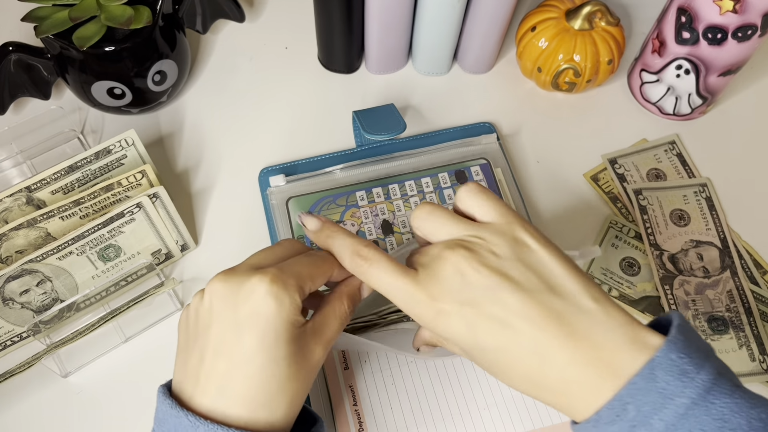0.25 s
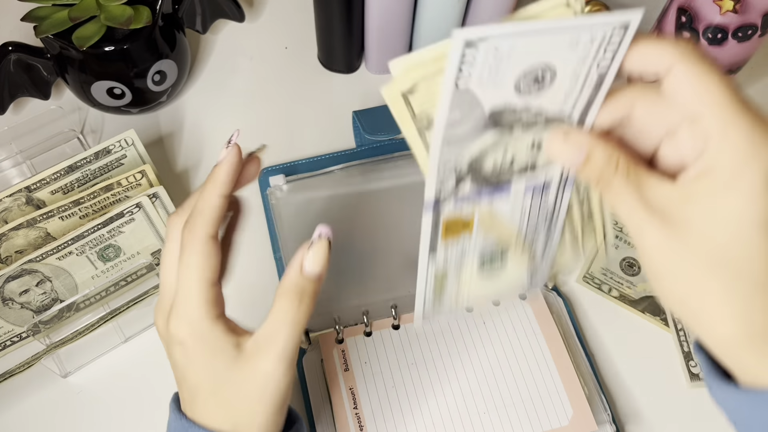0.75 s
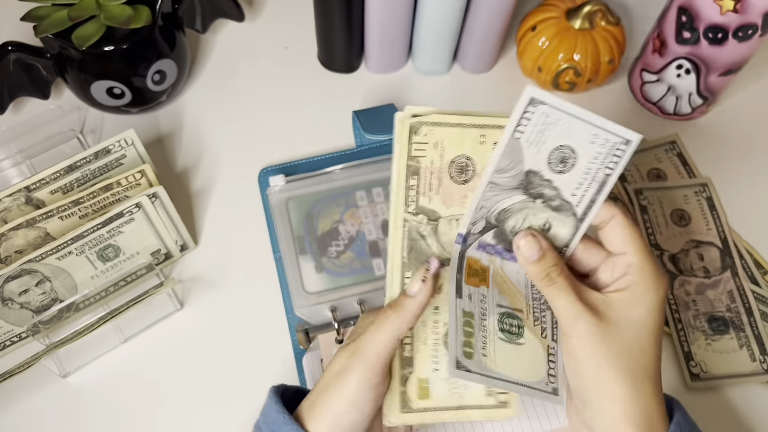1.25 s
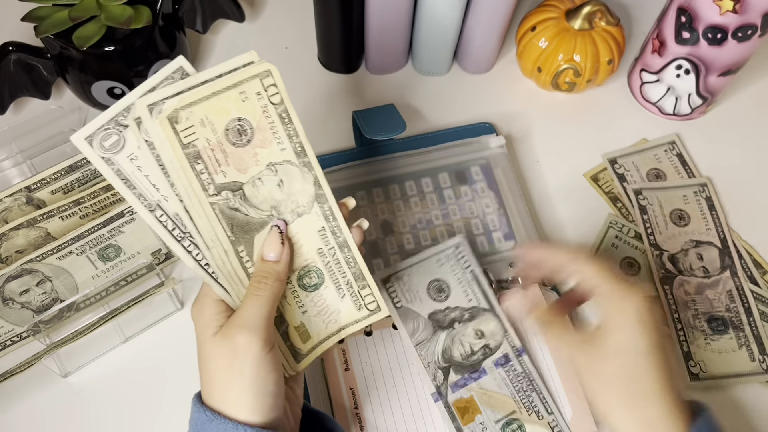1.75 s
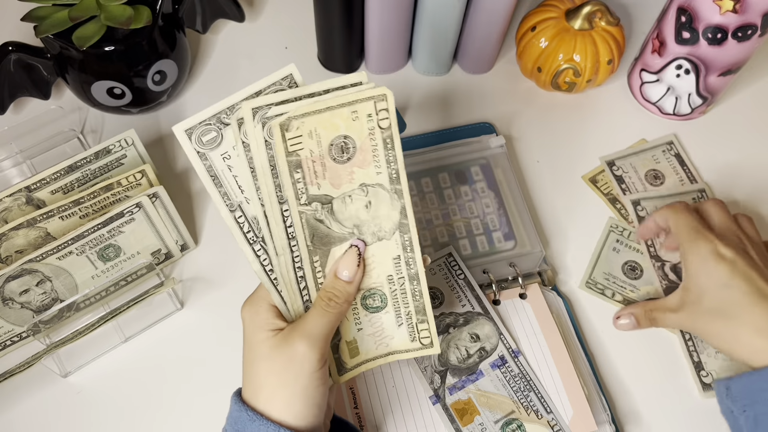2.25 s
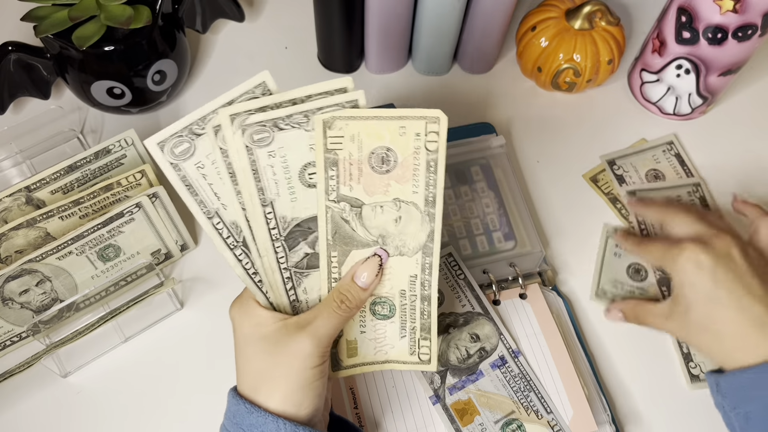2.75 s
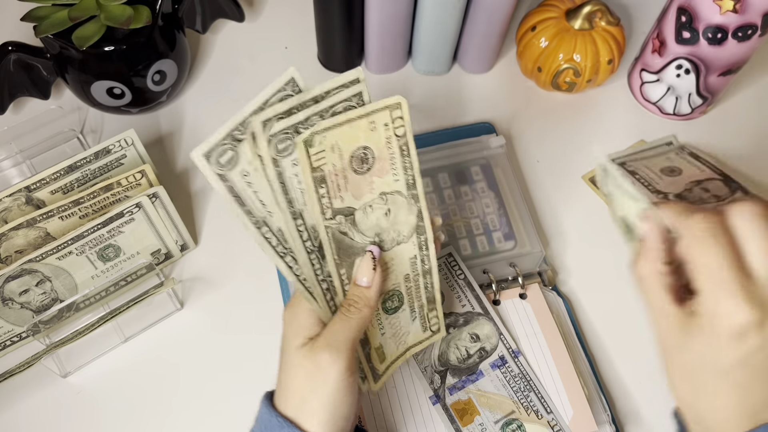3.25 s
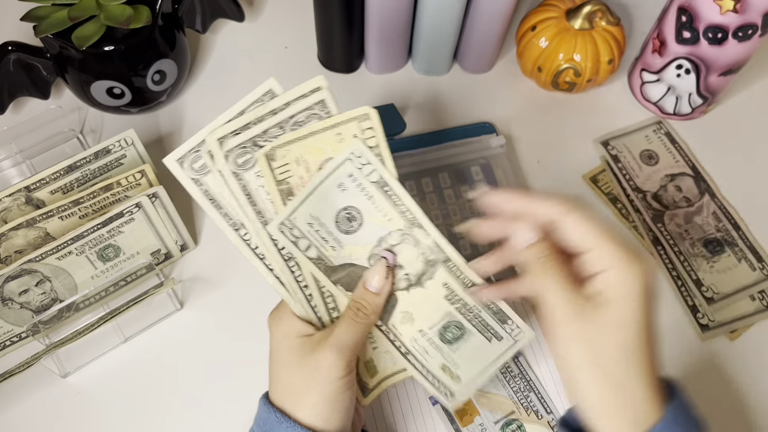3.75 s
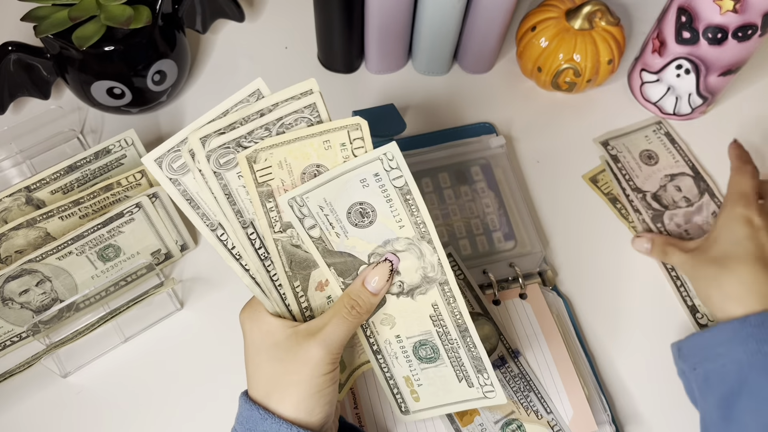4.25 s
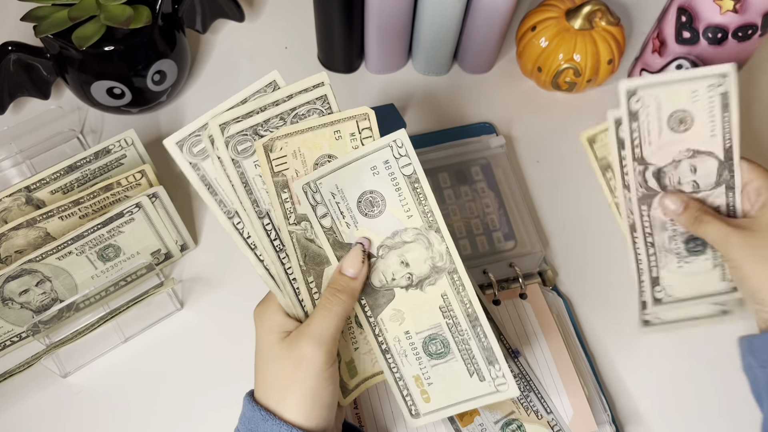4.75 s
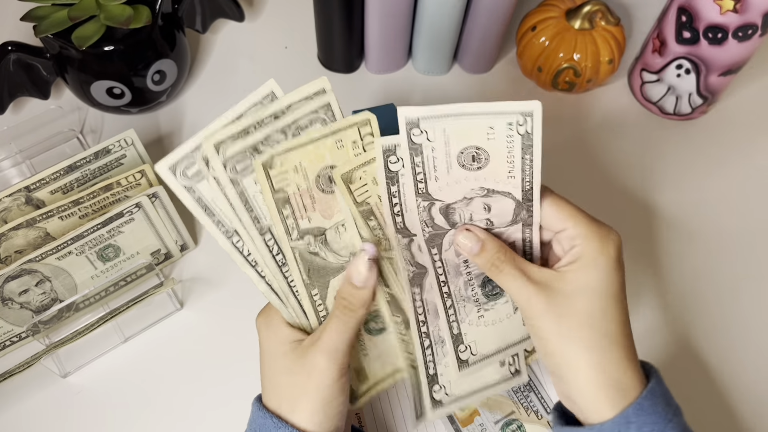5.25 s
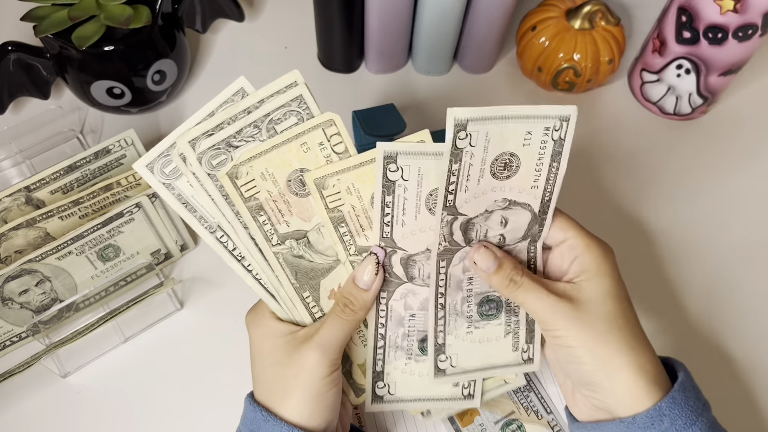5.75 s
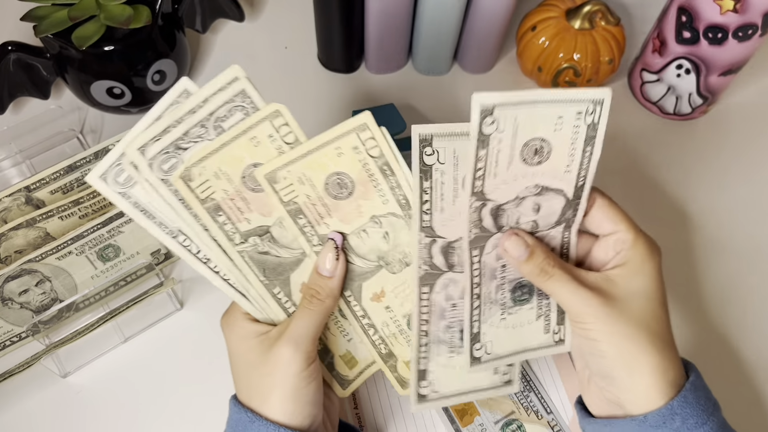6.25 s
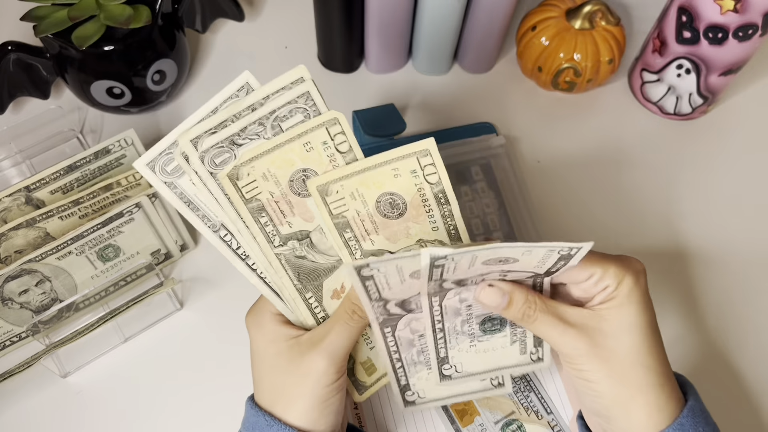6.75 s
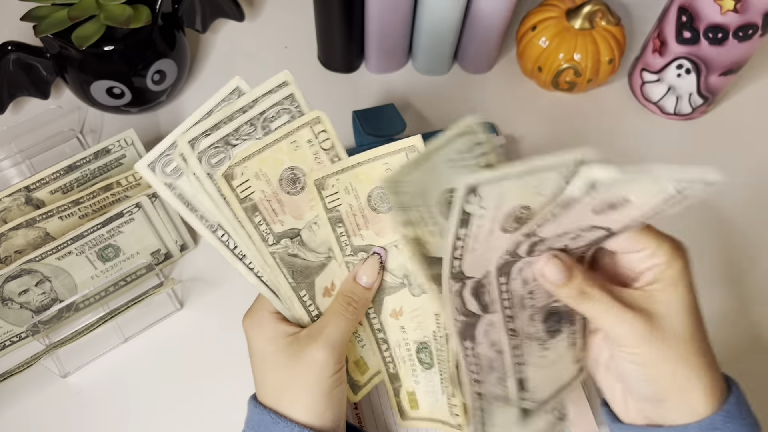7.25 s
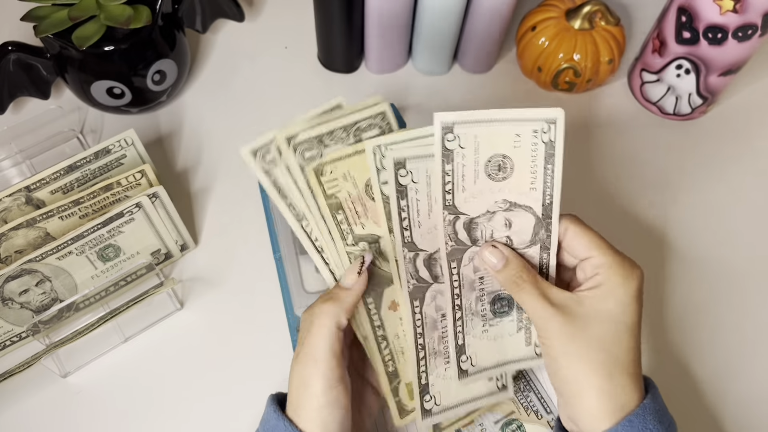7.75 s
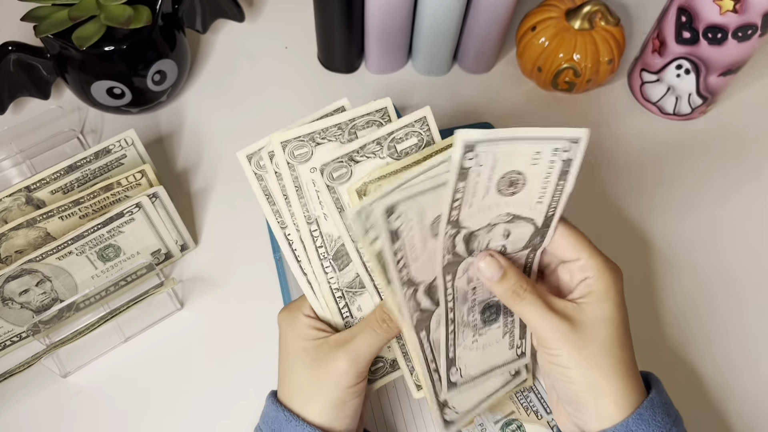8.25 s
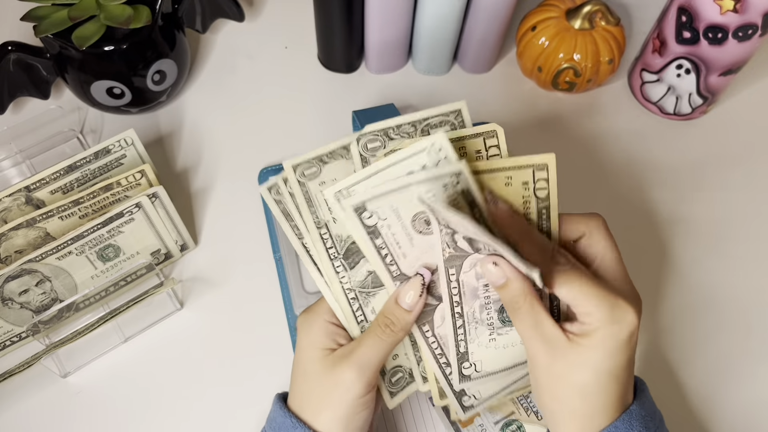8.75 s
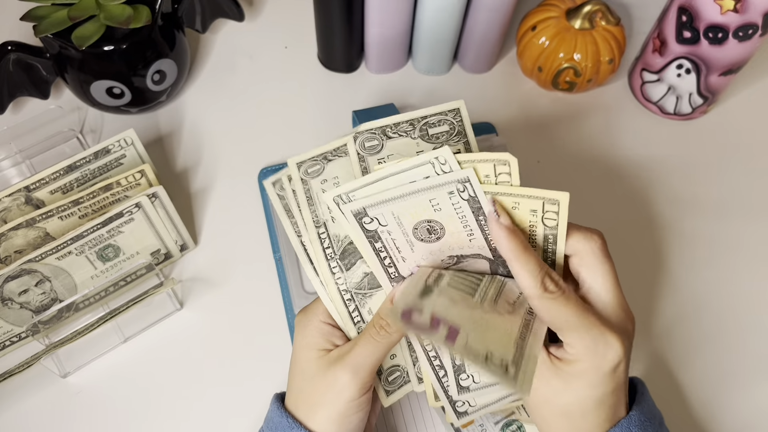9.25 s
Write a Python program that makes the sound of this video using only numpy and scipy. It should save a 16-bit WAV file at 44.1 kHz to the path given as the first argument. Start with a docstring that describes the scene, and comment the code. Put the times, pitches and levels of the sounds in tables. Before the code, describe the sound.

Dry paper handling heard by a nearby phone microphone: notes hiss over one another, edges flick free and creases pop. It starts busy, with pouch ticks and dull hand and binder knocks on the desk, quiets after two seconds, revives with crisp flicks and a double thump, then settles into softer shuffling and a last burst of snaps. The room is small, with little echo and a low background rumble.

```python
"""A small quiet room, close under a phone: banknotes leave a plastic pouch, are sorted and fanned by hand over a desk.
Sliding sheets hiss as noise in stick-slip grains; flicked edges, snapping creases and wrinkles ring patches of paper.
Fingertips pat the stack as short band noise; hands and a binder knock and drag on the desk's decaying modes.
A faint rumble, a thin hiss and a whine, all shaped noise, lie under it."""
import sys
import numpy as np
from scipy import signal
from scipy.fft import rfft, irfft, next_fast_len
from scipy.io import wavfile
from scipy.ndimage import uniform_filter1d, map_coordinates

SR = 44100
rng = np.random.default_rng(int(sys.argv[2]) if len(sys.argv) > 2 else 0)


def master(y):
    """Save y as 16-bit WAV."""
    cut = np.clip(np.atleast_2d(y).T, -1, 1)
    pcm = np.round(cut * 32767)  # scale
    wavfile.write(sys.argv[1], SR, pcm.astype(np.int16))


N = 419391
TIME = np.arange(N) / SR


def undb(db):
    """Decibels to gain."""
    return 10 ** (np.asarray(db) / 20)


def unit(x):
    """Scale to rms 1."""
    return x / np.sqrt(np.mean(x ** 2) + 1e-30)


def colour(points, hz):
    """Read a spectrum in dB on a log-frequency axis."""
    point_hz, db = np.transpose(points)
    return np.interp(np.log(np.maximum(hz, 1)), np.log(point_hz), db)


def bins_hz(size):
    """Frequencies of the rfft bins."""
    return np.arange(size // 2 + 1) * SR / size


def add(out, start_s, x):
    """Mix a sound in at its start time."""
    i = int(start_s * SR)
    out[:, i:i + x.shape[-1]] += x[..., :max(N - i, 0)]


def pair(size, spread):
    """Noise at two ports: a common part and a share that each hears alone."""
    common = rng.standard_normal(size)
    return unit(common + spread * rng.standard_normal((2, size)))


def walk(rate_hz, size):
    """Random values at a given rate, joined by straight lines, with a spread near 1."""
    steps = np.arange(size) * rate_hz / SR
    count = int(steps[-1]) + 2
    return 1.2 * np.interp(steps, np.arange(count), rng.standard_normal(count))


def rubbing(motion, times_s):
    """Level, body and sheen of the sliding sheets at the given times."""
    motion_s, *columns = motion
    return [np.interp(times_s, motion_s, c) for c in columns]


# A narrow whine: centre in Hz, width in Hz, left level in dB.
WHINE = (1715, 59, -71.5)


def whine():
    """A narrow, wavering band of noise, mostly on the left."""
    hz, width_hz, db = WHINE
    edges_hz = (hz - width_hz / 2, hz + width_hz / 2)
    band = signal.butter(2, edges_hz, "bandpass", fs=SR, output="sos")
    return unit(signal.sosfilt(band, pair(N, spread=2.5))) * undb([[db], [db - 7.5]])


def steady(points, spread):
    """Background noise of a given colour, rms 1."""
    size = next_fast_len(N, True)
    spectrum = rfft(pair(size, spread), size) * undb(colour(points, bins_hz(size)))
    return unit(irfft(spectrum, size)[:, :N])


# Hiss spectrum. Each row: frequency in Hz, relative density in dB per Hz.
HISS_COLOUR = [(100, -33), (500, -17), (900, -14), (1350, -3), (1550, -2), (1750, 0.5), (2100, -6.5),
               (2550, -12.5), (2800, -20), (5200, -30), (6800, -30.5), (9000, -55.5), (15000, -37)]


def hiss(left_db=-62.5, right_db=-72):
    """A thin band of noise, slightly unsteady and mostly on the left."""
    noise = steady(HISS_COLOUR, spread=11.0) * undb(1.0 * walk(21, N))
    return noise * undb([[left_db], [right_db]])


# Rumble between the strokes. Each row: time in seconds, level in dB.
RUMBLE_LEVEL = [(0, -57.5), (1.95, -63), (3.1, -62), (3.6, -57.5), (4.15, -63.5), (4.6, -55.5),
                (5.7, -64.5), (6.05, -63), (7.3, -62), (8.6, -59), (9.5, -60)]


def stirring(motion, arm_db=-6, sway_s=0.11, shake_db=-17, shake_decay_s=0.061):
    """Rumble strength: it swells as the arms move the sheets, and each knock shakes the desk for a moment."""
    db, body_db, _ = rubbing(motion, TIME)
    rest = undb(np.interp(TIME, *np.transpose(RUMBLE_LEVEL)))
    arms_power = uniform_filter1d(undb(db + body_db / 2 + arm_db) ** 2, int(sway_s * SR))
    blows = np.zeros(N)
    for start_s, knock_db, *_ in KNOCKS:
        blows[int(start_s * SR)] = undb(knock_db + shake_db)
    shake = signal.lfilter([1], [1, -np.exp(-1 / (shake_decay_s * SR))], blows)
    return np.sqrt(rest ** 2 + arms_power + shake ** 2)


# Rumble spectrum. Each row: frequency in Hz, relative density in dB per Hz.
RUMBLE_COLOUR = [(20, -32), (32, -15), (45, -0.5), (65, 3), (95, -1.5), (125, -1.5), (170, -20.5),
                 (260, -21.5), (500, -35), (1200, -96)]


def rumble(motion, uneven_db=3.0, uneven_rate_hz=11):
    """Low noise in both ports, uneven and stirred by the handling."""
    noise = steady(RUMBLE_COLOUR, spread=0.22)
    return noise * stirring(motion) * undb(uneven_db * walk(uneven_rate_hz, N))


def ring(modes, centre_hz, focus_db, skew_rad, t, roughness=0.35, rise_cycles=0.36, travel=0.031, deepest_db=19):
    """Desk modes around a centre; bending waves bring the lows later and build over about a cycle."""
    out = 0
    for hz, db, t60_s in modes:
        detune, turn, left, right = rng.standard_normal(4)
        delay_s = travel / np.sqrt(hz) * (hz < 350)
        age_s = np.maximum(t - delay_s, 0)
        swell = 1 - np.exp(-(age_s * hz / rise_cycles) ** 2)
        decay = np.exp(-np.log(1000) * age_s / t60_s)
        # each port meets the mode's pattern at its own phase
        port_rad = skew_rad * np.array([[left], [right]])
        wave = np.sin(2 * np.pi * (hz * (1 + 0.016 * detune) * age_s + turn) + port_rad)
        # loose things lying on the desk roughen each mode
        wave = wave * (1 + roughness * walk(hz / 2, len(t)))
        off_centre_db = min(focus_db * np.log2(hz / centre_hz) ** 2, deepest_db)
        out = out + undb(db - off_centre_db) * swell * decay * wave
    return out / np.sqrt(np.mean(out[:, :int(.04 * SR)] ** 2))


# Upper desk-top modes. Each row: nominal frequency in Hz, relative level in dB, t60 in seconds.
DESK_HIGH = [(448, -5.5, 0.16), (468.4, 9, 0.061), (529, 0, 0.2), (587, -3.5, 0.061), (665, -9, 0.1),
             (760, -8, 0.094), (979.6, -6.5, 0.15), (1060, -6.5, 0.06), (1124.3, -5, 0.14),
             (1251.3, -8.5, 0.062), (1498, -27, 0.53), (1574, -6.5, 0.079), (1880, -12, 0.098)]


def scraping(motion, light_db=5, range_db=8, judder_db=3, judder_rate_hz=120, spread=0.96):
    """A hand pressed hard enough to give the rubbing body drags on the desk and keeps its modes singing."""
    db, body_db, _ = rubbing(motion, TIME)
    pressure = np.clip((body_db - light_db) / range_db, 0, 1)
    judder = judder_db * walk(judder_rate_hz, N)
    drag = pair(N, spread) * undb(db + body_db + judder) * pressure
    out = 0
    for hz, mode_db, t60_s in DESK_HIGH:
        pole = np.exp((2j * np.pi * hz - np.log(1000) / t60_s) / SR)
        gain = undb(mode_db - 7.0) * np.sqrt(1 - abs(pole) ** 2)
        out = out + gain * signal.lfilter([1], [1, -pole], drag).imag
    return out


# Lower desk-top modes. Each row: nominal frequency in Hz, relative level in dB, t60 in seconds.
DESK_LOW = [(68, -1, 0.13), (95.6, -15.5, 0.094), (117.52, 6, 0.35), (163.6, -8, 0.38), (192.7, 0.5, 0.24),
            (231, -4.5, 0.09), (285.5, 3, 0.18)]
# Hands and binder on the desk. Each row: start in seconds, level in dB, strongest ring in Hz,
# hardness (upper modes) in dB, gain under the resting hand in dB.
KNOCKS = [(0.01, -54.5, 184, -30, -3), (0.211, -44.5, 179, -8, -4), (0.513, -35.5, 157, -33, -8),
          (0.655, -47.5, 158, -14, 5.5), (0.903, -45.5, 123, -12, -3), (0.971, -46.5, 124, -18, -6),
          (1.006, -43, 189, -16, -17), (1.03, -46, 190, -19, -14), (1.263, -41, 114, -19, -9),
          (1.717, -32.5, 117, -28, -9), (1.836, -48, 120, -20, -21), (2.084, -49, 160, -15, -2),
          (2.142, -38.5, 187, -7.5, -12), (2.198, -37.5, 189, -7.5, 1), (2.252, -44, 200, -0.5, -8),
          (2.287, -36.5, 193, -9, -19.5), (2.537, -50.5, 182.2, -15, 6.5), (2.613, -50, 174, -17, -18),
          (2.735, -57, 178, -8, 4), (2.812, -52, 177.5, -11.5, -8), (2.844, -61, 205, 4.5, 5),
          (3.122, -55, 97, -21, -1), (3.202, -61, 285, 1, -11), (3.431, -55.5, 142, 1.5, 2),
          (3.508, -55, 130, 0, 2), (3.743, -54.5, 161, 0, -6), (4.255, -29, 210.6, -7, -5.5),
          (4.373, -30, 216, -2.5, -14), (5.308, -66, 258, 2, -5.5), (5.552, -57.5, 240, 7.5, -7),
          (5.591, -57, 130, -14, -3), (5.681, -60, 125, -12, 0), (5.724, -57, 95, -25, -7),
          (6.638, -51, 136, -23, -6), (7.315, -60, 263, -0.5, -14), (7.606, -52, 282, -18, -10),
          (7.65, -52, 277, -10, -9.5), (7.669, -53, 70, -48, -5), (8.184, -57.5, 107.3, -10, -1)]


def knocks(high_db=-1, slap_db=-5, slap_decay_s=0.013, settle_s=0.0173, settling_s=0.034, rattle=0.26, size=16384):
    """Each place on the desk favours its own low modes; harder contact slaps and wakes the upper ones."""
    out, t = np.zeros((2, N)), np.arange(size) / SR
    # the hand comes to rest and changes the level
    resting = np.clip((t - settle_s) / settling_s, 0, 1)
    slap_band = signal.butter(2, (330, 680), "bandpass", fs=SR, output="sos")
    for start_s, db, hz, hard_db, muted_db in KNOCKS:
        low = ring(DESK_LOW, hz, focus_db=35.5, skew_rad=0.38, t=t, roughness=rattle * undb(hard_db / 2))
        high = ring(DESK_HIGH, 750, focus_db=-1.0, skew_rad=1.0, t=t)
        slap = unit(signal.sosfilt(slap_band, pair(size, spread=0.54)))
        slap = slap * np.sqrt(0.013 / slap_decay_s) * np.exp(-t / slap_decay_s)
        upper = undb(high_db) * high + undb(slap_db) * slap
        add(out, start_s, undb(db + muted_db * resting) * (low + undb(hard_db) * upper))
    return out


# Fingertips on the stack. Each row: start in seconds, relative level in dB, centre of the bump in Hz.
PATS = [(1.197, -46, 600), (1.355, -48, 666), (1.496, -48, 834), (4.601, -54, 897), (5.057, -52, 834),
        (5.07, -53, 885), (5.131, -62, 840), (5.509, -48, 447), (6.48, -55, 690), (7.09, -48.5, 291),
        (7.274, -46, 1166), (7.552, -55, 460), (7.583, -54, 595), (7.653, -52, 860), (7.701, -47.5, 575),
        (7.891, -52.5, 570), (7.945, -55, 475), (8.044, -54, 583)]


def pats(level_db=-1, octaves=1.8, decay_s=0.004, rise_s=0.001, spread=0.41, size=4096):
    """A soft fingertip gives the layered notes a short, dull bump."""
    out, t = np.zeros((2, N)), np.arange(size) / SR
    for start_s, db, hz in PATS:
        edges_hz = hz * 2 ** (octaves * np.array([-.5, .5]))
        band = signal.butter(1, edges_hz, "bandpass", fs=SR, output="sos")
        push = pair(size, spread) * (1 - np.exp(-t / rise_s)) * np.exp(-t / decay_s)
        bump = unit(signal.sosfilt(band, push)) * np.sqrt(2 * decay_s * SR / size)
        add(out, start_s, undb(db + level_db) * bump)
    return out


# Colour of rubbed paper. Each row: frequency in Hz, relative density in dB per Hz.
PAPER = [(60, 1), (150, 2), (290, 9.5), (380, 3.5), (560, 4.5), (850, -0.5), (1250, 2), (2500, 0),
         (3600, 0.5), (5500, -3.5), (8300, -0.5), (11500, -4), (14500, -9.5), (15700, -3)]
# Full body, neutral middle and full sheen: three frequencies in Hz.
ZONES_HZ = (600, 2500, 9000)


def paper_db(hz, body_db, sheen_db):
    """Paper colour: a bending sheet adds body, a light dry touch adds sheen."""
    zone = np.interp(np.log(np.maximum(hz, 1)), np.log(ZONES_HZ), [-1, 0, 1])
    return colour(PAPER, hz) + np.maximum(-zone, 0) * body_db + np.maximum(zone, 0) * sheen_db


def radiate(push, body_db, sheen_db, length_s, ring_hz, ring_db, ring_octaves=0.13):
    """A short push rings a patch of the sheet; 1.2-5 kHz has rms 1 over the given length."""
    size = push.shape[-1]
    hz = bins_hz(size)
    peak_db = ring_db / (1 + (np.log2(np.maximum(hz, 1) / ring_hz) / ring_octaves) ** 2)
    # minimum phase: nothing sounds before the push
    cepstrum = irfft(np.log(undb(paper_db(hz, body_db, sheen_db) + peak_db)))
    cepstrum[1:size // 2] *= 2
    cepstrum[size // 2 + 1:] = 0
    spectrum = rfft(push) * np.exp(rfft(cepstrum))
    middle = irfft(spectrum * ((hz > 1200) & (hz < 5000)))
    return irfft(spectrum) * np.sqrt(2 * length_s * SR / np.sum(middle ** 2))


def crinkles(motion, level_db=-5, scatter_db=2.15, ring_hz=3100, ring_db=13, decay_s=0.00075,
             dull_db=-4, thin_db=-7, crowding=0.6, count=640, size=1024):
    """Small wrinkles pop at random, each with its own pitch; they crowd where the rubbing is hardest."""
    out, t = np.zeros((2, N)), np.arange(size) / SR
    effort = np.cumsum(undb(crowding * motion[1]))
    for when, strength, pitch in rng.random((count, 3)):
        start_s = np.interp(when, effort / effort[-1], motion[0])
        db, body_db, sheen_db = rubbing(motion, start_s)
        push = pair(size, spread=0.44) * np.exp(-t / decay_s)
        pop_hz = ring_hz * 2 ** (2.2 * (pitch - .5))
        pop = radiate(push, body_db + thin_db, sheen_db + dull_db, 0.00151, pop_hz, ring_db, ring_octaves=0.057)
        boost_db = -scatter_db * np.log(max(strength, .05))
        add(out, start_s, pop * undb(db + level_db + boost_db))
    return out


# Creases popping, nails and pouch ticking. Each row: start in seconds, level in dB, relative body in dB,
# relative sheen in dB, decay in seconds, ring of the buckling patch in Hz.
SNAPS = [(0.01, -45.5, 9.5, 6, 0.0025, 3180), (0.0444, -52.5, 4, -3.5, 0.0014, 1500),
         (0.0957, -39.5, -9, -8, 0.0093, 2610), (0.1715, -39, -1, -21, 0.0071, 1480),
         (0.2028, -26.5, -10, -33, 0.0032, 2280), (0.2289, -45, 5, 0.5, 0.00184, 1430),
         (0.2583, -45.5, -1, -6, 0.01, 1470), (0.4795, -36.5, -25.5, -27, 0.0028, 3220),
         (0.5633, -34.5, -36, 4, 0.0041, 2130), (0.857, -33.5, -16, -11, 0.0025, 1880),
         (0.892, -36, -5, -19, 0.0048, 1070), (0.959, -39.5, 0, 1.5, 0.003, 2480),
         (1.319, -37, -1, -14, 0.0058, 2580), (1.3741, -48.5, 0.5, 1, 0.0037, 2950),
         (1.3883, -38, -7.5, -17, 0.0048, 2920), (1.5696, -42, -17, 5.5, 0.0036, 2180),
         (1.6074, -44, -6, -10, 0.0024, 2600), (1.7623, -49.5, -6, 1, 0.0038, 2710),
         (1.8044, -47, -5, -8, 0.0013, 3780), (1.8122, -42, -0.5, -10, .009, 3850),
         (1.8393, -50.5, -3, -9, 0.0049, 1620), (2.079, -66.5, 3, 9, .002, 3500),
         (2.1289, -53, -24.5, 4, 0.0046, 5800), (2.1404, -44, 10, -8, 0.005, 1086),
         (2.611, -58, 1, -0.5, .002, 3500), (2.7235, -59, -3, 3, .001, 3500),
         (3.4255, -40, -13, -7.5, 0.011, 1296), (3.449, -42.5, -6, -2, 0.0074, 3130),
         (4.2524, -29, 3.5, 3, 0.0036, 4560), (4.3726, -33, 5, -4, 0.00297, 1120),
         (4.453, -51, -12.5, -14.5, .005, 2600), (4.4872, -32, -9, -12, 0.0034, 2580),
         (4.737, -48.5, 1, -8, 0.009, 1210), (4.7993, -50, -3, -4.5, 0.0013, 2630),
         (4.833, -47.5, -4, -7.5, 0.0022, 2550), (4.861, -56, -9, 6, 0.0028, 3440),
         (5.043, -46, 5.5, -11.5, 0.00246, 1400), (5.0848, -47.5, 5, -31.5, 0.0023, 2400),
         (5.149, -49.5, -1, -24, 0.0066, 1000), (5.225, -34.5, -2, -6, 0.0041, 1250),
         (5.3605, -48, -1, -27.5, 0.0024, 1720), (5.7789, -37, -1, 1, 0.0042, 1326),
         (6.1113, -56, 13, -1, 0.011, 1250), (6.348, -53, 0, -3, 0.0195, 1594),
         (6.5398, -57.5, -8, 10, 0.0076, 4360), (7.054, -41, -25, -13, 0.0023, 2190),
         (7.16, -46.5, -40.5, -10, 0.00385, 2160), (7.413, -50, -4, -10, 0.0086, 1025),
         (7.873, -45, -33, -9, 0.029, 1520), (8.123, -57, 9, -10, .004, 2600),
         (8.4962, -44.5, -3.5, -6, 0.0056, 3140), (8.569, -53, 0, -8, .006, 3000),
         (8.58, -44, -2.5, 5, 0.0031, 5700), (8.6009, -35.5, -5, 3, 0.0032, 2560),
         (8.6097, -35.5, -18.5, 5, 0.0014, 4570), (8.632, -39, -6, -9, 0.0088, 4600),
         (8.8082, -39.5, -7, -2, 0.0022, 3330), (8.9371, -38, -33, -18, 0.00097, 1780),
         (9.227, -58, -19.5, 17, 0.018, 1630)]


def snaps(crack=0.4, grain_db=3, ring_db=9, spread=0.22, size=4096):
    """A crease buckles with one sharp crack, and the sheet shivers for a few milliseconds."""
    out, t = np.zeros((2, N)), np.arange(size) / SR
    lift_db = ring_db / 3
    for start_s, db, body_db, sheen_db, decay_s, ring_hz in SNAPS:
        grains = unit(pair(size, spread) * undb(grain_db * walk(2576, size)))
        push = grains * np.exp(-t / decay_s)
        push[:, 0] += crack
        snap = radiate(push, body_db + lift_db, sheen_db + lift_db, 0.0022, ring_hz, ring_db)
        add(out, start_s, undb(db) * snap)
    return out


# An edge drags over the stack and slips free. Each row: middle in seconds, level in dB, relative body in dB,
# relative sheen in dB, half length in seconds, ring in Hz.
FLICKS = [(0.314, -51, -18.5, 3.5, 0.0035, 3860), (0.331, -43.5, -8, -3.5, 0.0068, 2054),
          (0.551, -38.5, -13.5, 6.5, 0.01, 3770), (0.639, -44, -13, -3, 0.0049, 1250),
          (1.245, -40.5, -5, -30, 0.0047, 2960), (1.465, -45.5, -11, -6.5, 0.007, 1380),
          (1.575, -37.5, -11.5, -35.5, 0.00252, 2236), (2.195, -50, 9, -7, 0.01, 1400),
          (2.275, -48, 7, -1, 0.011, 1800), (2.688, -61.5, -13, 11, 0.0042, 4400),
          (3.508, -44.5, -7.5, -5, 0.014, 2050), (3.549, -29, -20.5, -10, 0.002, 1780),
          (4.301, -48.5, -3, 1, 0.013, 4400), (4.462, -43.5, -21.5, -8, 0.008, 1357),
          (5.233, -43, -1.5, -9, 0.0056, 1320), (5.269, -45, 8, -2, 0.0046, 1340),
          (5.314, -50.5, 4, -4, 0.0055, 1850), (5.442, -50.5, -6.5, -4.5, 0.014, 1290),
          (5.546, -42.5, -17.5, -10, 0.011, 1320), (5.559, -34.5, 2.5, 0.5, 0.0024, 3700),
          (5.572, -40.5, -27, -11, 0.0049, 3700), (5.65, -47, -16, -21, 0.0034, 1270),
          (5.676, -38, -4, -9, 0.00241, 3430), (7.276, -50.5, -19.5, -5, 0.0071, 1830),
          (7.362, -50.5, -15, 1, 0.0053, 6330), (7.605, -53.5, 1, -17, 0.015, 2870),
          (7.708, -46, -7, -12.5, 0.0063, 3140), (8.614, -45.5, -12, 2, 0.012, 4540),
          (8.832, -56, 6, 20, 0.0077, 5000), (9.048, -50.5, -10.5, -1, 0.0042, 3280)]


def flicks(grain_db=2.0, grain_rate_hz=900, ring_db=10, spread=0.147, size=4096):
    """Slips crowd together as an edge bends, then die away once it is free."""
    out, t = np.zeros((2, N)), (np.arange(size) - size // 2) / SR
    lift_db = ring_db / 3
    for middle_s, db, body_db, sheen_db, half_s, ring_hz in FLICKS:
        bending = np.exp(-(t / half_s) ** 2 / 2)
        freed = np.exp(-np.abs(t / half_s) ** 1.48 / 2)
        swell = np.where(t < 0, bending, freed)
        push = pair(size, spread) * swell * undb(grain_db * walk(grain_rate_hz, size))
        flick = radiate(push, body_db + lift_db, sheen_db + lift_db, 2 * half_s, ring_hz, ring_db)
        add(out, middle_s + t[0], undb(db) * flick)
    return out


# One sheet drawn over another: notes drawn from the pouch, parted, tucked into a fan, gripped as a pile and
# lifted, pushed against the fan, thumbed apart, folded back. Each row: fastest at in seconds, rise in seconds,
# fall in seconds, relative level of 1.2-5 kHz in dB, body in dB, sheen in dB.
STROKES = [ (0.08, 0.094, .1, -56.5, 1, -3), (0.21, 0.11, 0.14, -45.5, -1, -17),
           (0.349, 0.043, 0.14, -48, -5, -7), (0.53, 0.1, 0.13, -43.5, -2, 2),
           (0.671, 0.067, 0.048, -50, -1, 0), (0.76, 0.094, 0.12, -61, 5.5, -14),
           (0.88, 0.04, 0.062, -49.5, 1.5, -4), (1.03, 0.14, 0.073, -54.5, 3, 4),
           (1.16, 0.084, 0.13, -48.5, -6, 3), (1.242, 0.085, 0.019, -46, 3.5, -5),
           (1.37, 0.098, 0.074, -56, 7.5, -16.5), (1.455, 0.11, 0.084, -48, 1.5, -0.5),
           (1.578, 0.015, 0.16, -48.5, -3.5, -5), (1.831, .03, .12, -67.5, -5, -7),
           (1.972, 0.11, .04, -73, -14, -3), (2.272, 0.13, 0.06, -58, 12.5, 3),
           (2.445, 0.05, .045, -65, 8.5, 11), (2.69, 0.17, 0.14, -63.5, 2, 5.5),
           (2.831, 0.03, 0.1, -61, 9.5, 5.5), (3.02, 0.13, 0.31, -59, -7, -1.5),
           (3.24, 0.054, 0.045, -54, 3, 4.5), (3.53, 0.082, 0.067, -46, 0.5, -1.5),
           (3.742, 0.092, 0.04, -46.5, 4, 2.5), (3.89, 0.14, 0.2, -65.5, 0.5, 5.5),
           (4.28, 0.02, 0.06, -46.5, 5.5, 1.5), (4.4, 0.091, 0.029, -48, 7, 3),
           (4.5, 0.058, 0.057, -49, 3, -2.5), (4.59, 0.078, 0.13, -53, 4.5, 4),
           (4.89, 0.13, .22, -58.5, 2, 2.5), (5.074, 0.066, .06, -62, 10, -12),
           (5.23, 0.094, 0.14, -55, 6, 0), (5.37, 0.15, 0.16, -56.5, 6, -4),
           (5.58, 0.11, 0.026, -46.5, 4.5, -7), (5.7, 0.15, 0.071, -52.5, 6, -2.5),
           (5.839, 0.084, 0.056, -58.5, 6.5, -3), (5.96, 0.057, 0.053, -78, 7.5, 10.5),
           (6.127, 0.05, 0.085, -57, 3, 4), (6.251, 0.064, 0.073, -64, 0, 3.5),
           (6.49, 0.13, 0.027, -60.5, 6.5, -2), (6.65, 0.12, 0.088, -59, 4.5, 2),
           (6.89, 0.055, 0.12, -57, -4.5, 5), (6.99, 0.089, 0.12, -57.5, -11, 10),
           (7.09, 0.17, 0.13, -55, 4, -3), (7.391, 0.47, 0.26, -61, 4.5, -0.5),
           (7.56, 0.041, 0.081, -55.5, -5, 2), (7.69, 0.083, 0.076, -53.5, 7, -1.5),
           (7.875, 0.12, 0.09, -58, 5, 2), (7.999, 0.06, 0.11, -60, 6, 0.5),
           (8.25, 0.24, 0.26, -62, 1.5, 1.5), (8.492, 0.13, 0.17, -56.5, -4, -1),
           (8.84, .17, 0.061, -52.5, 0.5, -1.5), (9.012, 0.12, 0.088, -55, -2, -1),
           (9.18, 0.098, 0.16, -57.5, -7.5, -3), (9.418, 0.023, 0.034, -55, -10, 4),
           (9.51, 0.064, .05, -52.5, -8.5, -1.5)]
# Notes merely held in the hand: relative level in dB, body in dB, sheen in dB.
HELD = (-88.5, -1.4, -3)


def strokes(step_s=0.002, drop_db=13.5, rise_power=1.44, fall_power=1.5):
    """Each stroke speeds up and slows down; overlapping ones add, and the louder sets the colour."""
    times_s = np.arange(0, N / SR + step_s, step_s)
    peak_s, rise_s, fall_s, db, body_db, sheen_db = np.transpose(STROKES)
    since_s = times_s[:, None] - peak_s
    rising, falling = np.abs(since_s / rise_s) ** rise_power, np.abs(since_s / fall_s) ** fall_power
    # drop_db down at one rise before the peak and one fall after it
    flank = np.where(since_s < 0, rising, falling)
    power = undb(db - np.minimum(drop_db * flank, 100)) ** 2
    held_db, held_body_db, held_sheen_db = HELD
    held = undb(held_db) ** 2
    total = power.sum(axis=1) + held
    body = (power @ body_db + held * held_body_db) / total
    sheen = (power @ sheen_db + held * held_sheen_db) / total
    return times_s, 10 * np.log10(total), body, sheen


def sliding(motion, level_db=-4.0, grain_db=0.0, grain_rate_hz=1500, catch_db=1.4, catch_rate_hz=110,
            flutter_db=3.0, spread=0.0833):
    """Fibres catch and slip in dense grains; the sheet's colour flutters as it bends."""
    db, body_db, sheen_db = rubbing(motion, TIME)
    roughness_db = grain_db * walk(grain_rate_hz, N) + catch_db * walk(catch_rate_hz, N)
    grains = unit(pair(N, spread) * undb(roughness_db))
    size = next_fast_len(N, True)
    spectrum, hz = rfft(grains, size), bins_hz(size)
    centres_hz = np.geomspace(100, 15000, 22)
    out = 0
    # overlapping triangular bands, each with its own flutter
    for centre_hz, share in zip(centres_hz, np.eye(len(centres_hz))):
        weight = np.interp(hz, np.r_[0, centres_hz], np.r_[0, share])
        band = irfft(spectrum * weight, size)[:, :N]
        band_db = db + paper_db(centre_hz, body_db, sheen_db) + flutter_db * walk(35, N)
        out = out + band * undb(band_db)
    # levels refer to the 3800 Hz wide middle band
    return out * undb(level_db) * np.sqrt(SR / 2 / 3800)


def mirrored(x, echo_db=-8, lag_s=0.001097, sway=0.2252, sway_rate_hz=7):
    """The desk mirrors the moving sheets; the lag follows their height, so the colour keeps shifting."""
    moving_lag_s = lag_s * np.exp(sway * walk(sway_rate_hz, N))
    echo = np.array([map_coordinates(c, [(TIME - moving_lag_s) * SR], order=3) for c in x])
    return (x + undb(echo_db) * echo) / np.sqrt(1 + undb(echo_db) ** 2)


# Phase between the microphone ports. Each row: frequency in Hz, lead of the left port in radians.
PORTS = [(0, 0), (260, -0.1), (1980, 0.2), (3100, 1.0), (4910, 0.4), (5510, -0.9), (6370, -1.0),
         (7750, -2.8), (8870, -3.4), (11100, -6.0), (12900, -6.5), (13300, -7.3), (14700, -9.0),
         (16000, -9.5)]


def ports(x, left_db=0.07):
    """Sound from the desk reaches the two microphone ports out of step."""
    size = next_fast_len(N, True)
    lead_rad = np.interp(bins_hz(size), *np.transpose(PORTS))
    side = np.array([[1], [-1]])
    turned = rfft(x, size) * np.exp(1j * side * lead_rad / 2)
    return irfft(turned, size)[:, :N] * undb(side * left_db)


def room(x, wet_db=-15, t60_s=0.33, damp_hz=6000, gap_s=0.012):
    """Nearby things and walls return a short, duller tail."""
    t = np.arange(SR // 2) / SR
    tail = rng.standard_normal((2, len(t))) * np.exp(-np.log(1000) * t / t60_s) * (t > gap_s)
    tail = unit(tail) / np.sqrt(len(t))
    tail = signal.sosfilt(signal.butter(1, damp_hz, fs=SR, output="sos"), tail)
    return x + undb(wet_db) * signal.fftconvolve(x, tail, axes=1)[:, :N]


def scene():
    """Paper and desk in the room, over the background."""
    motion = strokes()
    background = whine() + hiss() + rumble(motion)
    desk = scraping(motion) + knocks()
    paper = pats() + crinkles(motion) + snaps() + flicks() + mirrored(sliding(motion))
    return background + room(ports(desk + paper))


def record(dry, bass_hz=36, top_hz=15750):
    """The phone cuts the deepest bass and the top."""
    thinned = signal.sosfilt(signal.butter(3, bass_hz, "highpass", fs=SR, output="sos"), dry)
    return signal.sosfilt(signal.ellip(8, .2, 70, top_hz, fs=SR, output="sos"), thinned)


dry = scene()
out = record(dry)
master(out)
```